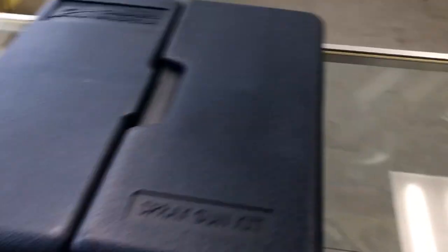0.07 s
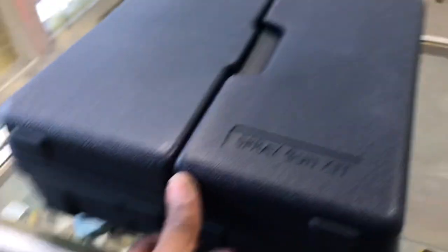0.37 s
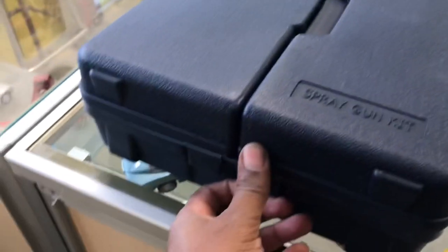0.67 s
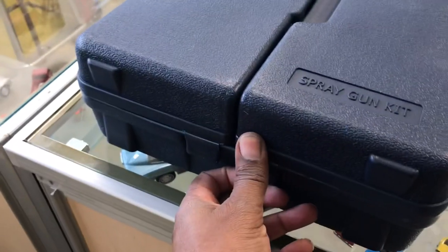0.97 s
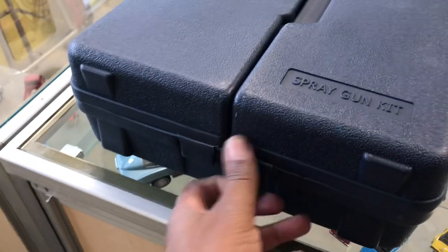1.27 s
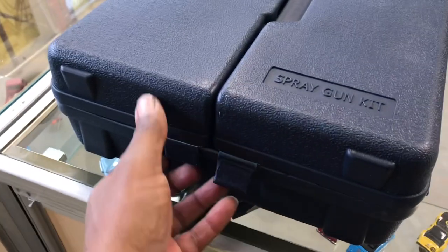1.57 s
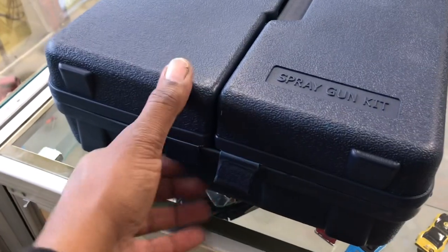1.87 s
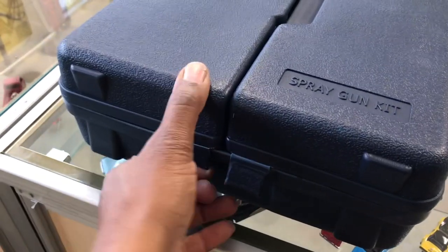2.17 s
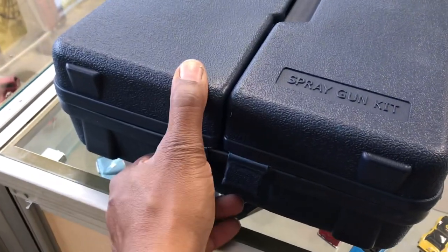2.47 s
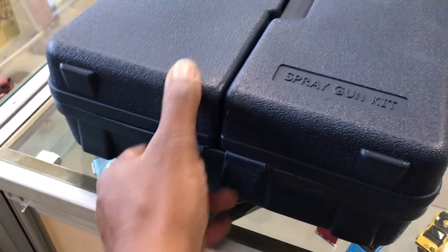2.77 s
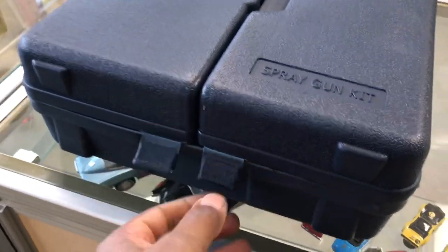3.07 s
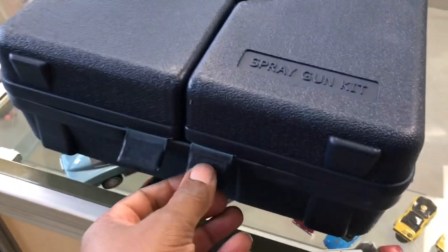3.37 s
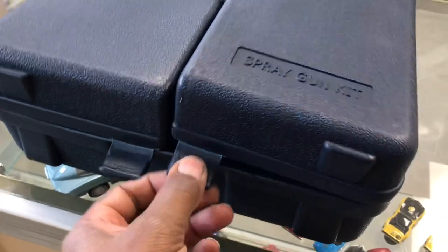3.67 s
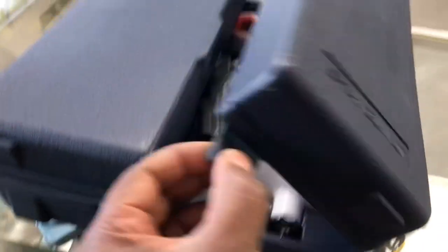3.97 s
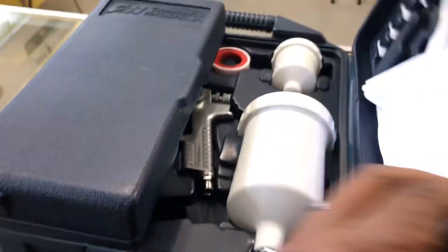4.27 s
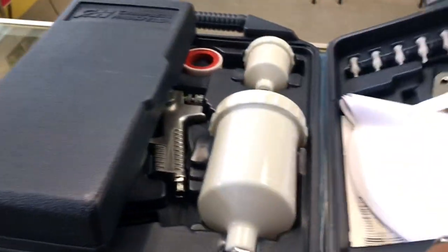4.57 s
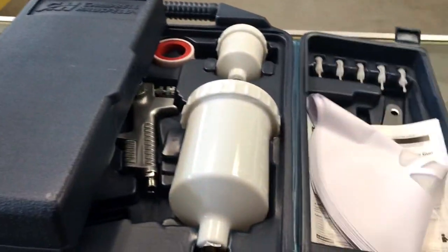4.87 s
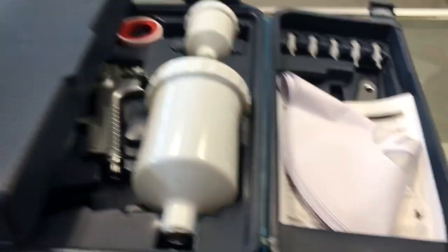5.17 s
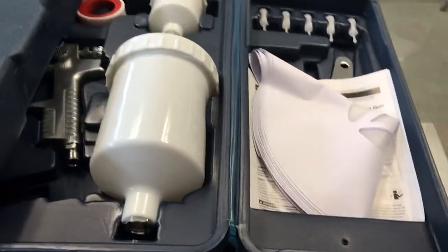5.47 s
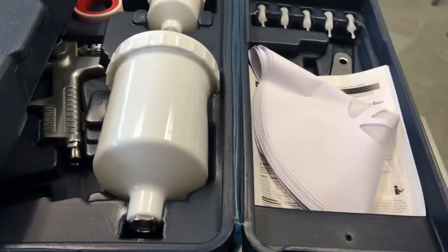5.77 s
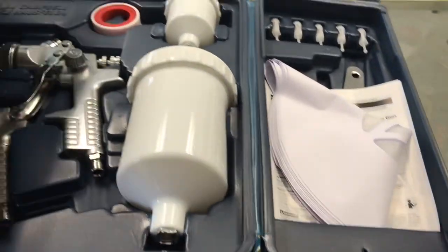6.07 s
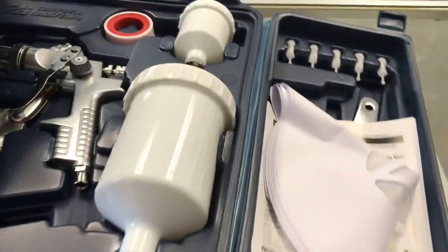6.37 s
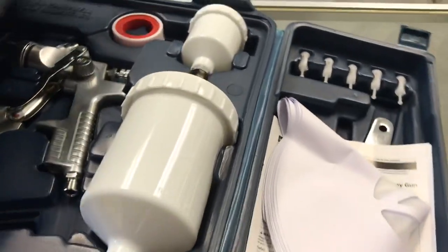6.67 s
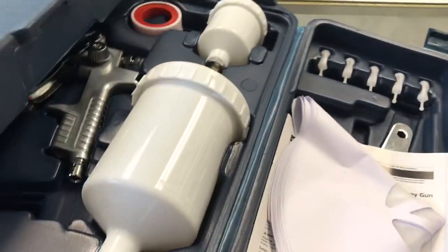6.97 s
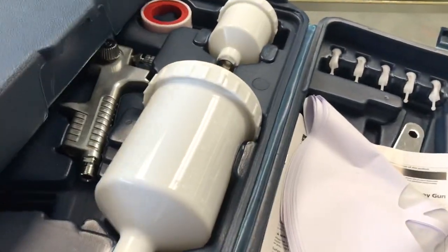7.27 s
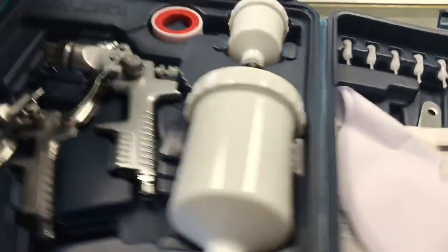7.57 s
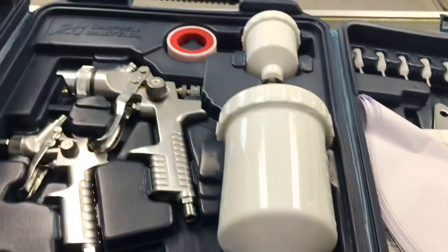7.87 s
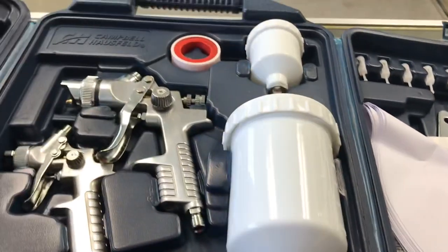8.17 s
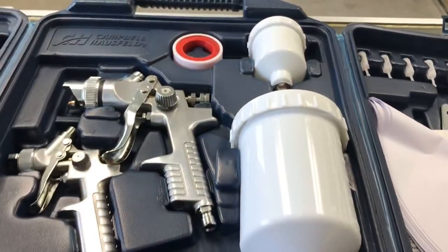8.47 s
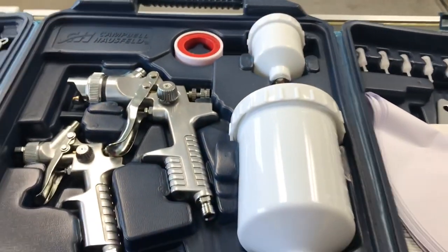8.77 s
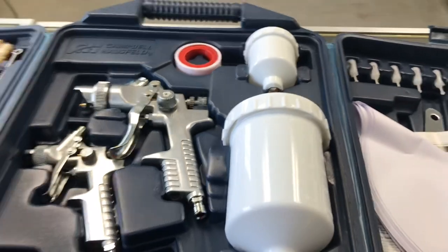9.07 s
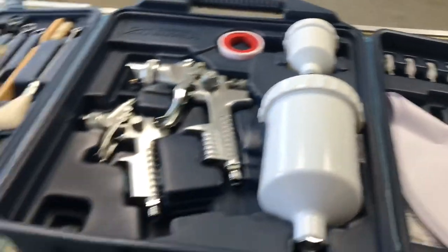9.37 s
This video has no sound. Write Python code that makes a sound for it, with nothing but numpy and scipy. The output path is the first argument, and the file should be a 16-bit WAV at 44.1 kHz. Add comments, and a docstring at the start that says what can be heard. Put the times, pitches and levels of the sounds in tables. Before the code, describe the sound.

Sharp plastic latch snaps, light handling and creaking hinges, and two lid knocks that rattle metal tools, over a low room hum.

```python
"""Opening a plastic tool case

A hollow case sits close by on a shop counter. Two latches snap open, then each lid half swings over
and drops: every blow cracks, rings the plastic, shakes the tools inside and briefly wakes the room.
In between, fingers knock and rub on the shell, and the hinge ticks and scrapes as it turns.
Underneath lie room noise, a deep rumble and the hum of a far engine."""
import sys
import numpy as np
from scipy import signal
from scipy.fft import rfft, irfft
from scipy.io import wavfile
from scipy.ndimage import uniform_filter1d

SR = 44100
rng = np.random.default_rng(int(sys.argv[2]) if len(sys.argv) > 2 else 0)


def to_wav(sig):
    """Store sig (one row per channel, or 1-D mono) as 16-bit WAV at the path in sys.argv[1].

    Samples outside -1..1 are clipped; the rate is SR.
    """
    pcm = np.clip(np.atleast_2d(sig), -1, 1) * 32767
    pcm = np.round(pcm).astype(np.int16)
    wavfile.write(sys.argv[1], SR, pcm.T)  # frames by channels


N = 419375
TIME = np.arange(N) / SR
AFTER = TIME[:SR]  # time within a one-second sound
HZ = np.fft.rfftfreq(SR, 1 / SR) + 1  # its frequency axis, kept clear of zero


def gain_of(db):
    """Decibels to amplitude."""
    return 10 ** (np.asarray(db) / 20)


def unit_rms(x):
    """Scales to rms 1."""
    return x / np.sqrt(np.mean(x ** 2) + 1e-20)


def read(points, hz):
    """Reads a spectrum table on a log-frequency axis."""
    f, value = np.transpose(points)
    return np.interp(np.log(hz + 1), np.log(f + 1), value)


def add(mix, s, sound):
    """Mixes a sound in at time s."""
    part = mix[max(round(s * SR), 0):][:len(sound)]
    part += sound[:len(part)]


def coloured(x, points, lift_db=0):
    """EQs a scene-long signal with a table, at rms 1."""
    eq_db = read(points, np.fft.rfftfreq(N, 1 / SR)) + lift_db
    return unit_rms(irfft(rfft(x) * gain_of(eq_db), N))


def wander(count):
    """A slow curve through count random points, at rms 1."""
    return unit_rms(np.interp(TIME, np.linspace(0, TIME[-1], count), rng.standard_normal(count)))


def decay(t60):
    """An envelope that falls 60 dB in t60 seconds."""
    return np.exp(-np.log(1000) * AFTER / t60)


def ring(modes):
    """Damped modes struck together; neighbours swing in opposite directions."""
    return sum((-1) ** k * gain_of(db) * decay(t60) * np.sin(2 * np.pi * hz * AFTER)
               for k, (hz, db, t60) in enumerate(modes))


def random_phases(colour_db):
    """The spectrum of countless overlapping modes, at rms 1."""
    spectrum = gain_of(colour_db) * np.exp(2j * np.pi * rng.random(len(HZ)))
    return spectrum / np.std(irfft(spectrum, SR))


def dense_ring(colour_db, t60):
    """Countless overlapping modes that die together."""
    return irfft(random_phases(colour_db), SR) * decay(t60)


def banded_ring(colour_db, t60, build_s):
    """Countless modes, each band with its own t60; build_s is the attack at 1 kHz, slower in the bass."""
    spectrum, out = random_phases(colour_db), np.zeros(SR)
    centres = np.geomspace(50, 16000, 11)
    for centre, share in zip(centres, np.eye(len(centres))):
        band = irfft(spectrum * np.interp(np.log(HZ), np.log(centres), share), SR)
        rise = 1 - np.exp(-AFTER / (build_s * np.sqrt(1000 / centre)))
        out += band * rise * decay(np.interp(centre, HZ, t60))
    return out


# room tone EQ: f/Hz, level/dB
AIR_COLOUR = [(15, -44), (30, -17), (53, -2.5), (80, -14.5), (114, -1.5), (145, -9), (212, -10), (277, -17),
              (354, -13), (460, -21.5), (920, -15.5), (1560, -20.5), (3620, -38), (8000, -44), (16000, -49)]
# its fader ride, ahead of the boost: t/s, level/dB
AIR_LEVEL = [(0, -61.5), (2.3, -60), (3.6, -57.5), (6, -58.5), (8, -60.5), (9.5, -59)]
def room_tone(boost_db=6):
    """A dark bed of shop noise that swells slowly."""
    level_db = np.interp(TIME, *np.transpose(AIR_LEVEL)) + boost_db
    return gain_of(level_db) * coloured(rng.standard_normal(N), AIR_COLOUR)


# low-end swells: middle t/s, length/s, level/dB
RUMBLE_SWELLS = [(3.723, .3, -51), (6.334, 0.12, -55.5), (7.694, .3, -53), (9.05, 0.54, -53)]
# rumble EQ: f/Hz, level/dB
RUMBLE_COLOUR = [(15, -40.5), (32, -8), (46, 3.5), (62, -12.5), (100, -24.5), (300, -69)]
def rumble(steady_db=-61):
    """Narrow deep noise that swells now and then over a steady floor."""
    swells = sum(gain_of(db) * np.exp(-(2 * (TIME - s) / length) ** 2) for s, length, db in RUMBLE_SWELLS)
    return (gain_of(steady_db) + swells) * coloured(rng.standard_normal(N), RUMBLE_COLOUR)


# one rev, then idle: t/s, f/Hz, pre-EQ level/dB
ENGINE = [(0, 76, -61), (0.8, 87, -49), (1.398, 77.9, -46), (1.902, 55, -58), (3.9, 57.95, -55),
          (5.7, 56.07, -52.5), (6.9, 52.64, -47.5), (7.398, 53.9, -66), (9.51, 56.26, -71)]
# EQ for how the engine carries into the shop: f/Hz, level/dB
ENGINE_COLOUR = [(55, -3), (80, -7), (110, -3), (165, -5), (250, -15.5)]
def far_engine(orders_db=(0, 0, -13), waver=0.008, throb_db=0.9):
    """The three lowest orders of an engine whose speed and strength never hold quite still."""
    s, pitch_hz, level_db = np.transpose(ENGINE)
    hz = np.interp(TIME, s, pitch_hz) * (1 + waver * wander(count=110))
    angle = 2 * np.pi * np.cumsum(hz) / SR
    hum = sum(gain_of(db + read(ENGINE_COLOUR, k * hz)) * np.sin(k * angle)
              for k, db in enumerate(orders_db, 1))
    level = gain_of(np.interp(TIME, s, level_db) + throb_db * wander(count=110))
    return level * np.sqrt(2) * hum


# reverb time of the shop: f/Hz, t60/s
ROOM_DECAY = [(60, 0.36), (150, 0.63), (400, 0.65), (1000, 0.39), (2500, 0.4), (6000, 0.44), (15000, 0.25)]
def shop_reverb(x, wet_db):
    """The diffuse tail that the shop adds to the small sounds."""
    colour_db = read([(100, 6.5), (1000, -1), (4000, -6.5), (15000, -5.0)], HZ)
    tail = banded_ring(colour_db, read(ROOM_DECAY, HZ), build_s=0.0046)
    return gain_of(wet_db) * signal.fftconvolve(x, tail / np.linalg.norm(tail))[:N]


# boxy resonances of the shell: f/Hz, width/Hz, lift/dB
SHELL = [(420, 56, 10.5), (536, 60, 7), (689, 85, 11), (965, 130, 7), (1394, 450, 8.5), (2720, 150, 4.5),
         (3350, 370, 3), (4150, 500, 4), (6100, 430, 2.5), (7500, 300, -1.5)]
def shell_db(hz):
    """The lift that the shell's resonances give to a touch."""
    return sum(lift_db / (1 + (2 * (hz - centre) / width) ** 2) for centre, width, lift_db in SHELL)


def touch_db(centre_hz, octaves):
    """The spectrum of a touch: a hump with gentle skirts, heard through the shell."""
    hump_db = -12 * np.log(1 + (np.log2(HZ / centre_hz) / octaves) ** 2 / 2)
    return hump_db + shell_db(HZ)


def friction(size, slips_per_s=9000, patchy_db=3):
    """Tiny slips over a pebbled surface; the wandering contact favours one resonance after another."""
    slips = rng.choice([-1, 1], size) * (rng.random(size) < slips_per_s / SR)
    frames = signal.stft(slips, nperseg=512, noverlap=384)[2].T
    patches = uniform_filter1d(rng.standard_normal(frames.shape), size=11, axis=0)  # smooth in time
    patches = uniform_filter1d(patches, size=6, axis=1)  # and in frequency
    frames = frames * gain_of(patchy_db * unit_rms(patches))
    return signal.istft(frames.T, nperseg=512, noverlap=384)[1][:size]


# soft brushes of skin and sleeve on plastic: middle t/s, length/s, level/dB, centre f/Hz
RUBS = [(0.02, 0.065, -43.5, 690), (0.36, 0.32, -64.5, 2820), (0.475, 0.11, -56.5, 4200),
        (1.325, 0.1, -55, 1980), (1.418, 0.094, -54, 1500), (1.545, 0.085, -53.5, 4270),
        (1.605, 0.06, -60, 2600), (1.815, 0.1, -50.5, 2000), (1.879, 0.038, -49, 1300),
        (2.72, 0.11, -64, 3800), (3.667, 0.05, -49, 3970), (3.869, 0.038, -42.5, 2500),
        (4.195, 0.094, -53, 2190), (4.57, 0.36, -69.5, 3450), (5.48, .09, -55, 4000),
        (5.661, 0.054, -53.5, 6400), (5.727, 0.058, -54, 4500), (6.668, 0.026, -44, 1000),
        (8.373, 0.39, -62, 3010), (9.068, 0.064, -64, 2500)]
# pitched creaks, plastic sticking and slipping on plastic: middle t/s, length/s, level/dB, centre f/Hz
CREAKS = [(3.335, 0.073, -63.5, 6270), (5.473, 0.089, -45.5, 2100), (6.466, 0.082, -52.5, 970),
          (6.572, 0.061, -45.5, 970), (6.55, .1, -57, 6900), (6.669, .035, -43, 2730),
          (6.727, 0.045, -46.5, 447), (7.035, 0.036, -49, 2730), (9.2, 0.061, -53, 3067)]
def strokes(rows, octaves):
    """Short slides that excite a band of the shell under one arch of pressure."""
    out = np.zeros(N)
    for s, length, db, centre_hz in rows:
        grain = irfft(rfft(friction(SR)) * gain_of(touch_db(centre_hz, octaves)), SR)
        arch = np.sin(np.pi * np.minimum(AFTER / length, 1))
        add(out, s - length / 2, gain_of(db) * unit_rms(grain) * arch)
    return out


# shoves that turn the left lid on its hinge: start t/s, length/s, final level/dB
SHOVES = [(6.07, 0.23, -55), (6.387, 0.34, -51), (6.849, 0.074, -46.5), (7, 0.096, -47.5),
          (7.301, 0.26, -45.5)]
# scrape EQ: f/Hz, level/dB
SCRAPE_COLOUR = [(100, -10), (200, 0.5), (600, -12), (1000, -8), (2000, -14.5), (3000, -12), (5000, -17),
                 (8500, -20.5), (10700, -30.5), (14000, -21), (16000, -33.5)]
def lid_scrape(grip_s=0.031, swell_db=2, let_go_t60=0.4):
    """Gritty friction of the turning lid: each shove takes hold, swells under the hand and dies away."""
    pressure = np.zeros(N)
    for s, length, db in SHOVES:
        grip = np.minimum(AFTER / grip_s, 1)
        press_db = swell_db * (np.minimum(AFTER / length, 1) - 1)
        let_go = np.exp(-np.log(1000) * np.maximum(AFTER - length, 0) / let_go_t60)
        add(pressure, s, gain_of(db + press_db) * grip * let_go)
    grit = friction(N, slips_per_s=1600, patchy_db=4)
    return pressure * coloured(grit, SCRAPE_COLOUR, shell_db(np.fft.rfftfreq(N, 1 / SR)))


# sharp ticks in latch and hinge: t/s, level/dB
TICKS = [(3.676, -34.5), (5.8595, -49.5), (5.961, -37), (6.1438, -41.5), (6.355, -41), (6.394, -40),
         (6.52, -35.5), (7.525, -34.5)]
# their brittle EQ: f/Hz, level/dB
TICK_COLOUR = [(500, -19.5), (2700, -1), (5000, 2), (8500, 2), (10800, -7), (14000, 10.5), (15800, -4.5)]
def plastic_ticks(t60=0.015, turn_from_s=5.3, turn_to_s=7.6, steps_per_s=6):
    """Strained plastic ticks; while the hinge turns it also gives way in faint random steps."""
    out = np.zeros(N)
    colour_db = read(TICK_COLOUR, HZ)
    for s, db in TICKS:
        add(out, s, gain_of(db) * dense_ring(colour_db, t60))
    turning = (TIME > turn_from_s) & (TIME < turn_to_s)
    steps = turning * (rng.random(N) < steps_per_s / SR)
    sizes = gain_of(-47.5 + 9.5 * rng.uniform(-0.81, 1, N))
    return out + signal.oaconvolve(steps * sizes, dense_ring(colour_db, t60))[:N]


# thin metal partials: f/Hz, level/dB, t60/s
METAL_MODES = [(1730, -43, 0.1), (2710, -50, 0.21), (4500, -51, .28), (4550, -53.5, .28), (5360, -53, .2),
               (5850, -51, 0.15), (6300, -54, .2), (8590, -39.5, 0.134)]
def metal_clink(at_s=0.539, wash_db=-44.5):
    """Something metal is touched once: clear partials over a wash of dense modes."""
    out = np.zeros(N)
    wash = dense_ring(touch_db(centre_hz=3000, octaves=1.1), t60=0.22)
    add(out, at_s, ring(METAL_MODES) + gain_of(wash_db) * wash)
    return out


# bumps on the shell: t/s, level/dB, t60/s
THUMPS = [(3.555, -33, 0.17), (3.689, -33, 0.13), (6.959, -33.5, 0.074), (7.097, -27, 0.11)]
# their dull EQ: f/Hz, level/dB
THUMP_COLOUR = [(30, -25), (60, 1), (130, -6), (290, 1.5), (420, -15), (800, -13), (1600, -34), (5000, -66)]
def shell_thumps(rise_s=0.0024):
    """The hollow shell answers a bump with a soft-edged boom."""
    out = np.zeros(N)
    attack = 1 - np.exp(-AFTER / rise_s)
    for s, db, t60 in THUMPS:
        add(out, s, gain_of(db) * dense_ring(read(THUMP_COLOUR, HZ), t60) * attack)
    return out


# light taps of fingers, latches and lid: t/s, level/dB, centre f/Hz
CLICKS = [(0.874, -49, 5500), (0.9987, -31, 7000), (1.364, -43, 2920), (1.416, -39.5, 1210),
          (1.787, -32.5, 3020), (3.553, -38, 1000), (3.657, -42, 1870), (3.676, -29, 4500),
          (3.696, -40.5, 1000), (3.8273, -29, 2600), (4.329, -43, 5700), (4.7855, -25.5, 2197),
          (6.954, -37, 2000), (7.079, -38.5, 1060), (7.096, -29.5, 1470), (7.166, -49, 3500),
          (7.174, -44.5, 3000), (7.8, -55.5, 4850), (8.217, -46.5, 2760), (8.254, -53, 5500),
          (8.472, -43, 1497), (9.479, -42.5, 11000)]
# knock of the front panel under each tap: f/Hz, relative level/dB, t60/s
PANEL_MODES = [(541, 2.5, 0.059), (766, 2.5, 0.024), (1075, 0.5, 0.047)]
def clicks(t60_cycles=75, knock_db=-2.5, knock_db_per_octave=-3.5):
    """Light contacts; a harder one is brighter and shorter and moves the panel less."""
    out = np.zeros(N)
    panel = ring(PANEL_MODES)
    for s, db, centre_hz in CLICKS:
        click = dense_ring(touch_db(centre_hz, octaves=0.8), t60_cycles / centre_hz)
        knock = gain_of(knock_db + knock_db_per_octave * np.log2(centre_hz / 1000)) * panel
        add(out, s, gain_of(db) * (click + knock))
    return out


# ringing body of each latch and lid half: f/Hz, level/dB, t60/s
RIGHT_LATCH = [(534, -12.5, 0.17), (650, -15.5, 0.09), (827, -9, 0.044), (878, -22, 0.14),
               (1086, -18, 0.041), (1180, -21.5, 0.0904), (1277, -16, 0.049), (2051, -13.5, 0.024),
               (2300, -15, 0.018), (8400, -11, 0.0074)]
LEFT_LATCH = [(119.3, -33, 1), (157.5, -19, 0.23), (221.5, -24, 0.4), (532, -3.5, 0.062),
              (850, -11.5, 0.016), (1216, -6, 0.018), (2155, -0.5, 0.006), (3670, -11, 0.0091),
              (4500, -19, 0.012)]
RIGHT_LID = [(154, -20.5, 0.49), (340, -17, 0.15), (373, -24, 0.34), (404, -9.5, 0.088), (648, -6.5, 0.046),
             (1054, -24.5, 0.3), (1190, -6, 0.011), (1370, -21, 0.13), (1606, -15, 0.064),
             (1795, -10.5, 0.026), (2370, -5.5, 0.0079), (2690, -20, 0.012)]
LEFT_LID = [(60, -25.5, .45), (114.8, -18, 0.79), (193, -20.5, 0.37), (366, -20.5, 0.19),
            (548, -22.5, 0.29), (640, -17.5, 0.056), (942, -10.5, 0.026), (1056, -11, 0.052),
            (1580, -3, 0.01), (1890, -15, 0.026), (3110, -25.5, 0.05), (3800, -11.5, 0.0094),
            (6450, -12.5, .008)]
# EQ of what the whole case throws into the shop at each blow: f/Hz, level/dB
RIGHT_LATCH_COLOUR = [(26, -29), (45, 0.5), (217, -3.5), (314, -8.5), (382, -6.5), (432, -12.5), (513, -1),
                      (672, -7.5), (971, -2), (1150, -9.5), (2530, -20), (4800, -31.5), (8040, -24.5),
                      (10800, -43), (16000, -48)]
LEFT_LATCH_COLOUR = [(26, -28), (45, -12), (79, -11.5), (101, -7), (129, -7), (291, -15.5), (525, -11),
                     (640, -17.5), (971, -19), (1050, -23.5), (2300, -27), (2600, -32.5), (16000, -53)]
RIGHT_LID_COLOUR = [(26, -39), (45, 2.5), (112, -16), (150, -9), (271, -10), (372, -4), (432, -13.5),
                    (760, -14.5), (880, -16), (1070, -11), (2130, -26.5), (2530, -27), (16000, -48.5)]
LEFT_LID_COLOUR = [(21, -40.5), (35, 2), (86, -22.5), (117, -5), (143, -10.5), (360, -16.5), (399, -15.5),
                   (543, -28), (587, -20.5), (1170, -20), (1510, -25), (2730, -28), (6520, -39.5),
                   (10300, -46.5), (16000, -43)]
# jingle of the metal tools inside: f/Hz, relative level/dB, t60/s
TOOL_MODES = [(2465, -4.5, .3), (2790, -4, 0.25), (3060, -4, 0.13), (4200, -7.5, 0.24), (5740, -16, .28),
              (6418, -8, 0.3)]
# the four main hits: t/s, crack level/dB, crack t60/s at 3 kHz, crack tilt/(dB per octave),
# room level/dB, tools level/dB, body table, EQ table
BLOWS = [(0.9997, -9.5, 0.026, -0.5, -22, -45, RIGHT_LATCH, RIGHT_LATCH_COLOUR),
         (2.5029, -11, 0.028, 0.5, -20.5, -43, LEFT_LATCH, LEFT_LATCH_COLOUR),
         (4.7452, -8.5, 0.029, 0.55, -17, -40, RIGHT_LID, RIGHT_LID_COLOUR),
         (8.4946, -8.5, 0.051, 0.5, -15, -29, LEFT_LID, LEFT_LID_COLOUR)]
def snaps_and_drops(damping=0.51):
    """A latch snaps or a lid lands: a bright crack, the part's modes, shaken tools, the shop's answer."""
    out = np.zeros(N)
    # presence EQ that makes the crack brighter than the tail: f/Hz, level/dB
    edge = [(60, -23.5), (300, -9.0), (900, -6.0), (2500, 1.5), (4500, 5.5), (8000, 3.5), (15000, 5.0)]
    for s, crack_db, crack_t60, tilt_db, room_db, tools_db, modes, colour in BLOWS:
        colour_db = read(colour, HZ)
        bright_db = colour_db + read(edge, HZ) + tilt_db * np.log2(HZ / 3000)
        t60 = crack_t60 * (HZ / 3000) ** -damping  # plastic damps its high modes soonest
        crack = gain_of(crack_db) * banded_ring(bright_db, t60, build_s=0.0001)
        tools = gain_of(tools_db) * ring(TOOL_MODES)
        room = gain_of(room_db) * banded_ring(colour_db, read(ROOM_DECAY, HZ), build_s=0.0027)
        add(out, s, ring(modes) + crack + tools + room)
    return out


def scene():
    """The shop bed, the handling with its reverb and the main hits, in mono."""
    bed = room_tone() + rumble() + far_engine()
    rubbing = strokes(RUBS, octaves=1.2) + strokes(CREAKS, octaves=0.27) + lid_scrape()
    handling = rubbing + plastic_ticks() + metal_clink() + shell_thumps() + clicks()
    return (bed + handling + shop_reverb(handling, wet_db=-11) + snaps_and_drops())[None]


def record(dry, low_cut_hz=30, high_cut_hz=16200):
    """Soft-clips the loudest peaks, then trims the sub-bass and the very top."""
    rounded = dry / (1 + dry ** 4) ** .25
    trimmed = signal.sosfilt(signal.butter(4, low_cut_hz, "high", fs=SR, output="sos"), rounded)
    high_cut = signal.firwin(255, high_cut_hz, window=("kaiser", 9), fs=SR)
    return signal.oaconvolve(trimmed, high_cut[None], "same")


dry = scene()
out = record(dry)
to_wav(out)
```